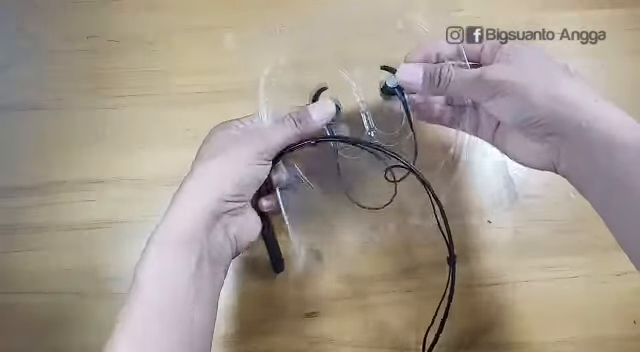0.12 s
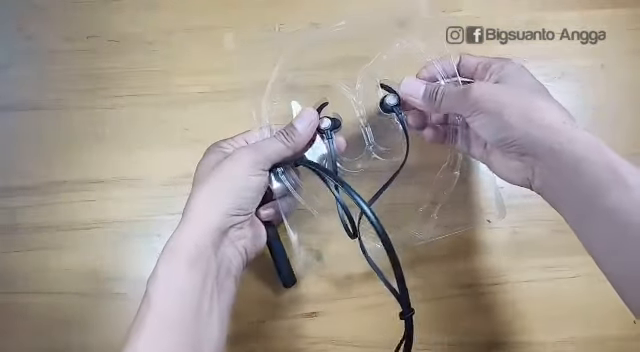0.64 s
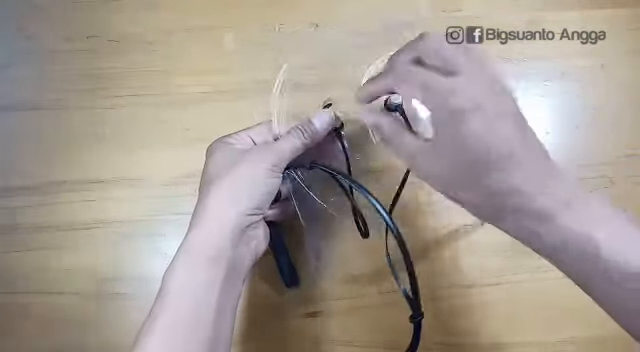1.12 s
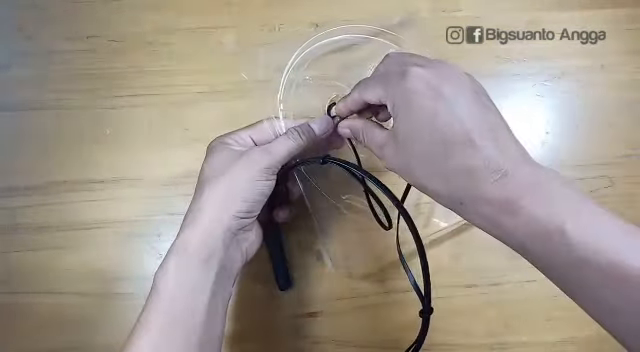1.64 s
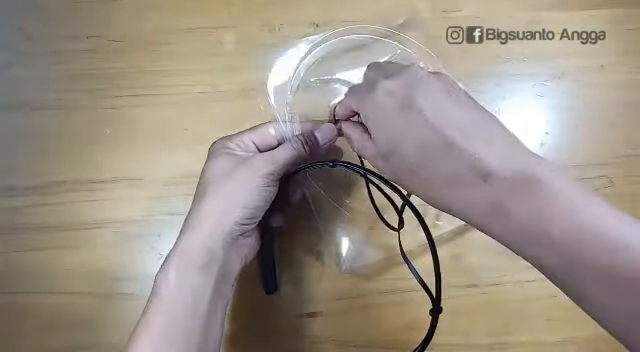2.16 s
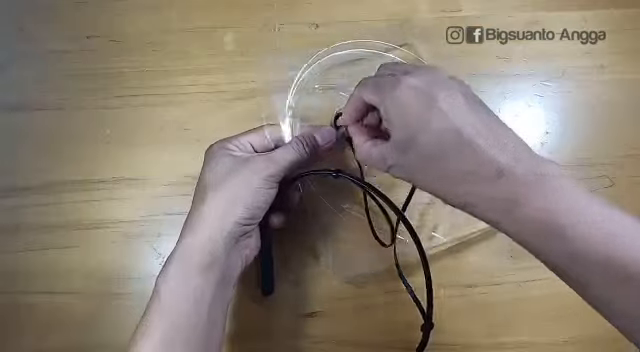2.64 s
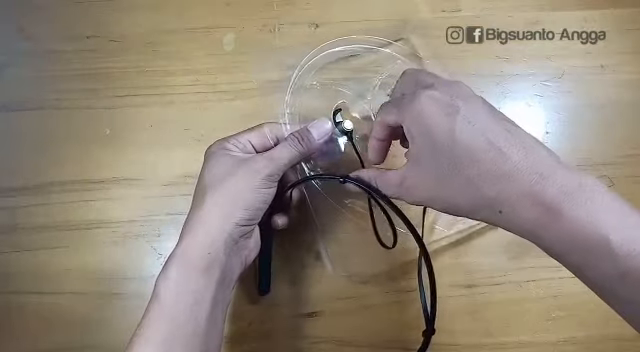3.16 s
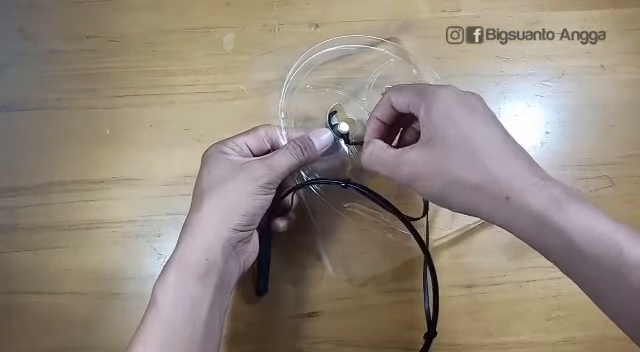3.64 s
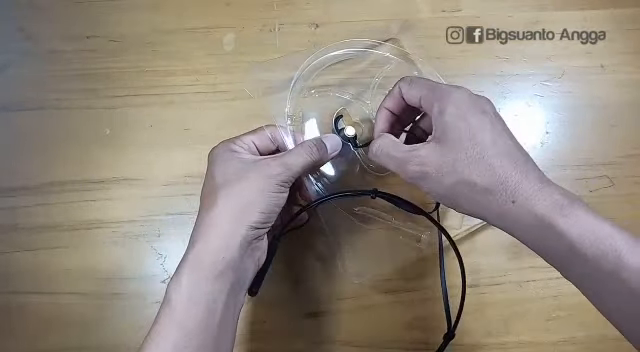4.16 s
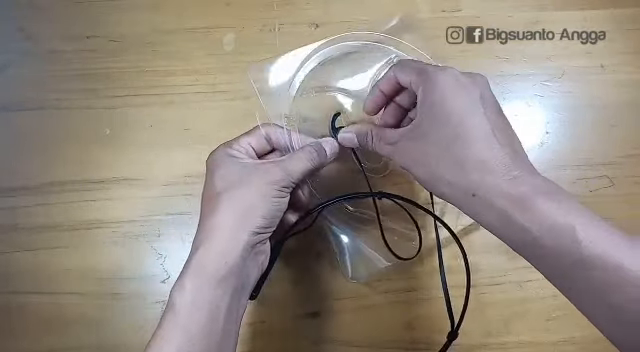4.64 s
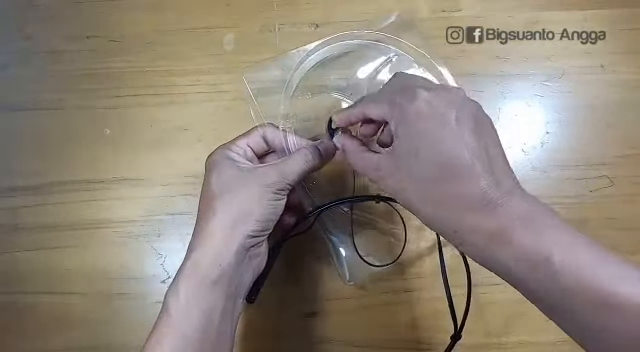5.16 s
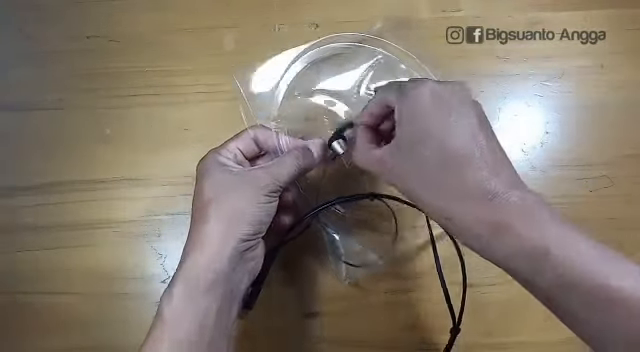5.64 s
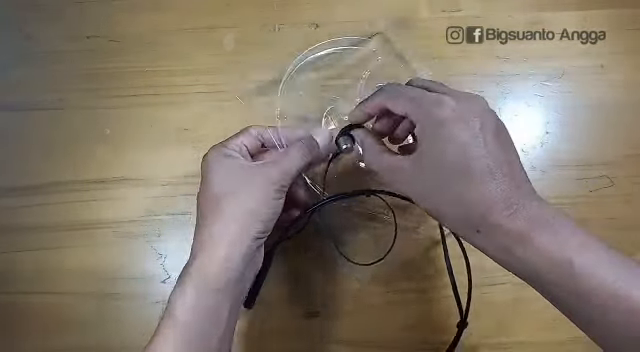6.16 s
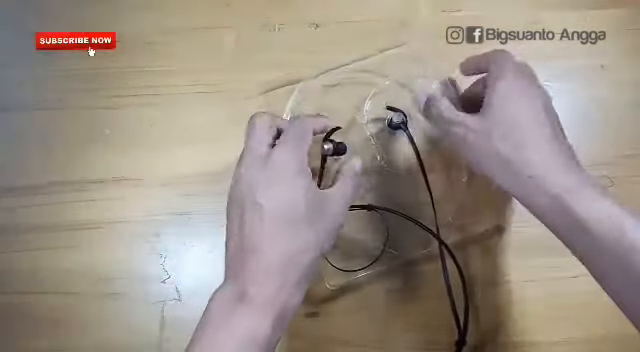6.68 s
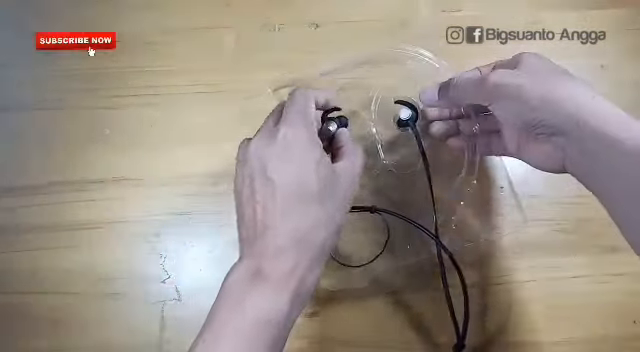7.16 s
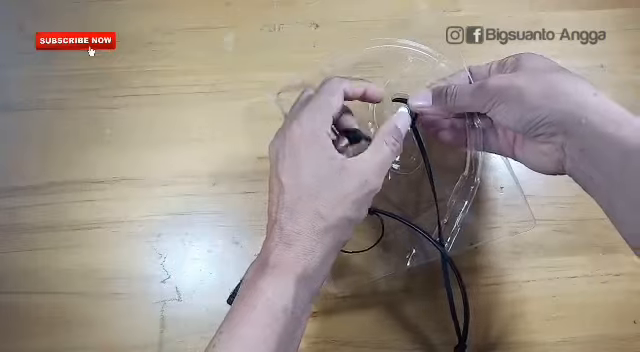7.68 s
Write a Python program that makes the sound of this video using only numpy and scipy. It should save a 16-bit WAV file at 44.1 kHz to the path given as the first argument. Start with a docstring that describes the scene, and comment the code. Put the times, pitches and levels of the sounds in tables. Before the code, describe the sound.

A thin moulded plastic tray is bent by fingers on a wooden table, heard close in stereo in a small hard room with short scattered echoes and faint hum and hiss. Soft ticks and rustling open the first 0.3 seconds, with sparse clicks until 0.8. From 1.0 to 1.5 come crackles and the strongest hollow cracks, near 1.1, 1.25 and 1.4. It quiets, then rustles and ticks at 2.4 to 2.9, with a dull knock at 3.1 and short squeaky pips near 3.45. Isolated clicks follow, with a sharp snap at 4.45 and more at 4.8 to 5.1. A brisk rub and bright snaps come at 5.7 to 5.8. From 6.1 to 6.65 crackling is dense, ending in heavier knocks. It thins to light rustles, small pips and a crisp snap at 7.4, fading into little handling noises.

```python
"""A thin moulded plastic tray snaps and ticks as fingers bend it on a wooden table, close to two microphones.
Each snap is a gritty burst of noise that sets the cups, panels and creases ringing. Cup walls give short pips
(fading tones), fingers and cable rustle over the tray (dense tiny ticks), and it knocks the table (low ringing tones).
A small hard room answers with scattered echoes, over a faint low hum and hiss made of shaped noise."""
import sys
import numpy as np
from scipy import signal
from scipy.fft import rfft, irfft
from scipy.io import wavfile
from scipy.ndimage import uniform_filter1d

SR = 44100
rng = np.random.default_rng(int(sys.argv[2]) if len(sys.argv) > 2 else 0)


def invert_db(x):
    """Field ratio 10**(x/20) for x, a level in decibels (scalar or array-like)."""
    u = np.asarray(x, float) / 20
    return 10 ** u


def output_pcm(signal):
    """Save a mono or channel-first signal as 16-bit PCM at the path in sys.argv[1].

    Samples are clipped to [-1, 1] before scaling.
    """
    pcm = np.clip(np.atleast_2d(signal).T, -1, 1) * 32767
    wavfile.write(sys.argv[1], SR, np.round(pcm).astype(np.int16))


N = 343539  # length of the scene in samples
LEAD = 512  # samples of faint crackle before a slip


def evened(x):
    """Scales a signal to an rms of 1."""
    return x / np.sqrt(np.mean(x ** 2) + 1e-20)


def read(points, hz, axis=1):
    """Looks up a column of a table between its points, on a log-frequency axis."""
    columns = np.transpose(points)
    return np.interp(np.log(hz + 1), np.log(columns[0] + 1), columns[axis])


def all_parts(cups, panels, creases, fizz):
    """Ribs lie between panels and creases; the airy top grows faster than the fizz as a slip gets brighter."""
    panel_share = 0.6
    ribs = invert_db(-0.5) * panels ** panel_share * creases ** (1 - panel_share)
    air = invert_db(1) * fizz * (fizz / creases) ** 0.79
    return [cups, panels, ribs, creases, fizz, air]


def rings(tear_s, size, creep_db, bend=0.064, uneven_db=2, grit_db=5):
    """Slips x parts x samples: a gritty burst that swells and dies sets each part of the plastic ringing."""
    # what cups, panels, ribs, creases, fizz and airy top ring with, one list for each part:
    # (pitch [Hz], level within the part [dB], time to fall by 60 dB [s])
    part_modes = [
        [(710, -5, 0.027), (827, 6.5, 0.011), (1026, 8.5, 0.012), (1253, 0, 0.01)],
        [(1557, 2, 0.011), (1994, 1.5, 0.0095), (2370, 4, 0.0056), (2695, -5, 0.011)],
        [(3130, -1.5, 0.0026), (3890, -3, 0.0065), (4366, -2, 0.004), (4880, -5, .0025)],
        [(5604, 1, 0.0022), (6467, 9.5, 0.0014), (7394, 0, 0.0011)],
        [(9460, 3.5, 0.00088), (11700, -5.5, 0.0015)],
        [(13100, 3, 0.0015), (14200, -7, 0.002)],
    ]
    slips = len(tear_s)
    tear = tear_s[:, None]
    t = np.arange(size) / SR
    since_start = t - LEAD / SR
    u = np.maximum(since_start, 0) / tear
    late = since_start - tear
    # faint crackle leads in and settles after
    creep = np.exp(np.where(late < 0, late / (3.6 * tear), -late / 0.0065))
    swell = np.e * u * np.exp(-u) + invert_db(creep_db) * creep
    swell = swell * invert_db(grit_db * rng.standard_normal((slips, size)))

    # each part feels its own grit
    noise = rng.standard_normal((slips, len(part_modes), size))
    spectrum = rfft(swell[:, None] * noise)
    # a slip drives all pitches evenly
    smooth_power = uniform_filter1d(abs(spectrum) ** 2, size // 64, axis=2)
    blows = irfft(spectrum / np.sqrt(smooth_power))

    out, ring_t = [], t[:1024]
    for modes, blow in zip(part_modes, blows.swapaxes(0, 1)):
        ring = 0
        for hz, db, t60 in modes:
            shift, loud = rng.standard_normal((2, slips, 1))
            mode_hz = hz * (1 + bend * np.tanh(shift))  # bending shifts every mode
            wave = np.sin(2 * np.pi * mode_hz * ring_t)
            # neighbouring modes start in opposite directions
            ring = invert_db(db + uneven_db * loud - 60 * ring_t / t60) * wave - ring
        edges = [0.75 * modes[0][0], 1.2 * modes[-1][0]]
        ring = signal.sosfilt(signal.butter(3, edges, "band", fs=SR, output="sos"), ring)
        sound = signal.fftconvolve(blow, ring, axes=1)[:, :size]
        # the loudest 96 samples get an rms of 1
        top = uniform_filter1d(sound ** 2, size=96, axis=1).max(1, keepdims=True)
        out.append(sound / np.sqrt(top))
    return np.stack(out, 1)


def snaps():
    """Creases flip over: every snap rings all parts, each at its own strength."""
    # the loud snaps, with the time the crease takes to give way and the strength in four parts:
    # (peak time [s], tearing [ms], moulded cups [dB], flat panels [dB], creases [dB], fizz [dB])
    snap_rows = [(0.0221, 0.8, -34.5, -41.5, -43, -64), (0.098, 0.4, -42, -34.5, -29, -35),
                 (0.158, 2.7, -40, -48, -44, -49), (0.196, 2, -44, -41, -39, -47.5),
                 (0.2119, 4, -37.5, -46.5, -37.5, -45), (0.58, 0.73, -44.5, -42, -41.5, -49),
                 (0.7758, 0.64, -66, -51, -35, -39.5), (0.7976, 0.17, -60, -53.5, -38, -37.5),
                 (1.0073, 2.6, -67.5, -54, -43, -55), (1.0255, 3.2, -32.5, -43.5, -32.5, -43.5),
                 (1.04, 2.8, -43, -32.5, -29.5, -52.5), (1.075, 3, -47, -40, -38, -49),
                 (1.1163, 0.12, -22, -17.5, -28.5, -41), (1.2437, 0.55, -29.5, -25.5, -40.5, -48),
                 (1.3817, 0.7, -26.5, -22.5, -31, -41.5), (1.4821, 1.6, -44.5, -42.5, -50, -71.5),
                 (1.8579, 0.82, -53.5, -71, -44.5, -71), (1.8671, 2.2, -45, -58.5, -53, -65.5),
                 (2.0597, 2, -48.5, -61.5, -80.5, -86), (2.356, 4.2, -42, -51, -62.5, -84),
                 (2.43, 0.93, -45, -49, -56, -56.5), (2.456, 4.4, -42.5, -46, -54, -53.5),
                 (2.509, 2.7, -44, -62, -47, -60), (2.568, 1.5, -51, -42, -33.5, -40),
                 (2.626, 1, -53, -43, -43, -57), (2.642, 1.46, -63, -42, -53, -69),
                 (2.7589, 1.4, -37.5, -45, -56, -83), (2.7868, 2, -41.5, -43.5, -56, -83),
                 (2.8114, 1.7, -29.5, -41.5, -54, -75.5), (3.1285, 2, -40, -41, -69, -84),
                 (3.409, 0.44, -61, -59, -65.5, -83), (3.772, 0.16, -40, -42, -64, -83),
                 (3.886, 1.15, -38, -41.5, -59, -85), (4.4326, 0.59, -50.5, -60, -55, -69),
                 (4.4545, 0.39, -26.5, -30, -22.5, -31), (4.478, 0.79, -34.5, -36, -43, -45),
                 (4.691, 0.75, -46.5, -70, -44.5, -78), (4.842, 0.35, -29, -36.5, -33, -46),
                 (4.9562, 0.58, -46.5, -61, -45.5, -60.5), (5.0202, 0.44, -53.5, -63, -20.5, -32),
                 (5.1038, 0.12, -69.5, -74, -29.5, -41.5), (5.2613, 1.2, -43.5, -47, -46.5, -60.5),
                 (5.5702, 3.1, -39.5, -43, -45, -60), (5.692, 1.6, -84, -86, -41, -67),
                 (5.731, 2, -29.5, -42, -49, -57), (5.7392, 0.18, -66, -61, -24.5, -35),
                 (5.748, 0.6, -29, -38.5, -29, -39.5), (5.788, 1.6, -29.5, -40, -24.5, -38.5),
                 (5.9771, 2.3, -45, -56.5, -51.5, -81), (6.009, .6, -48, -57, -40, -44),
                 (6.0248, 0.34, -78, -50.5, -39, -41.5), (6.1009, 0.14, -53, -54.5, -31, -41),
                 (6.1165, 0.14, -43.5, -50.5, -29, -38), (6.223, 1.32, -45, -39, -42, -56.5),
                 (6.2332, 0.15, -36, -43.5, -23.5, -40.5), (6.2503, 0.13, -45, -47.5, -26, -42.5),
                 (6.302, 1.24, -66, -43.5, -38.5, -55), (6.385, 2.7, -47, -34, -39, -49),
                 (6.43, 4.6, -38.5, -29, -37, -46), (6.4457, 0.52, -37, -38, -27.5, -43.5),
                 (6.4637, 0.68, -48, -34, -33, -48.5), (6.4753, 1.6, -38, -38.5, -35, -48.5),
                 (6.497, 1.5, -33.5, -35, -49, -49), (6.5288, 2.1, -34.5, -40, -41.5, -49.5),
                 (6.5503, 1.9, -43, -34, -47, -64.5), (6.58, 1.2, -48, -46, -43, -47.5),
                 (6.6336, 0.51, -23.5, -28, -41.5, -51), (6.651, 1, -26, -50, -50, -72),
                 (6.8285, 0.75, -54.5, -49.5, -59, -71), (7.084, 5, -52.5, -40, -46, -50),
                 (7.3289, 1.4, -36.5, -48, -39.5, -48), (7.4285, 1.0, -31, -32.5, -22.5, -33.5),
                 (7.476, 0.84, -34, -37, -48, -50)]
    out = np.zeros(N + SR)
    tear_s = np.array(snap_rows)[:, 1] / 1000
    for row, rise, ring in zip(snap_rows, tear_s, rings(tear_s, size=4096, creep_db=-15.0)):
        at = round((row[0] - rise - 0.0003) * SR) - LEAD  # the ring peaks just after the burst does
        strength = np.array(all_parts(*invert_db(row[2:])))
        out[at:at + ring.shape[1]] += strength @ ring
    return out[:N]


def pips():
    """A cup wall slips against a finger and sings a short soft-edged tone with two weak overtones."""
    # (peak time [s], peak level [dB], pitch [Hz], swell [ms], each overtone against the main tone [dB])
    pip_rows = [(.961, -36, 842, 5.6, -23), (2.734, -39.5, 1050, 2.8, -26), (2.885, -46, 1070, 3.5, -30),
                (3.451, -38.5, 1094, 4.4, -41), (3.463, -32, 920, 3.5, -16), (3.4775, -46.5, 750, 4.7, -12),
                (4.637, -42, 1050, 2.6, -26), (4.834, -38, 1034, 2, -18), (5.108, -33.5, 1084, 2.6, -28),
                (5.179, -37.5, 963, 2.4, -36), (6.585, -30.5, 923, 7, -33), (6.959, -49, 1144, 4, -31),
                (7.15, -37.5, 886, 6, -26), (7.278, -39, 1044, 5, -29), (7.633, -39.5, 885, 2.6, -17)]
    fade_swells, sag = 0.93, 0.045  # fade length in swells; share by which the pitch starts high and ends low
    out, t = np.zeros(N + SR), np.arange(4096) / SR
    for s, peak_db, hz, swell_ms, overtones_db in pip_rows:
        swell_s = swell_ms / 1000
        u = t / swell_s - 2  # 0 at the peak
        turns = np.cumsum(hz * (1 - sag * np.tanh(u))) / SR
        start = rng.random((3, 1))
        waves = np.sin(2 * np.pi * (np.arange(1, 4)[:, None] * turns + start))
        tone = invert_db([0, overtones_db, overtones_db]) @ waves
        envelope = np.exp(-2 * np.where(u < 0, u, u / fade_swells) ** 2)
        out[round((s - 2 * swell_s) * SR):][:len(t)] += invert_db(peak_db) * envelope * tone
    return out[:N]


def pressure(part):
    """Rub level in cups (0) or creases (1): rise, hold, fall and a slow settling, summed in power."""
    # each squeeze or rub of the fingers:
    # (full strength from [s], held [s], cups [dB], creases [dB])
    rub_rows = np.array([(0.0, 0.098, -62.5, -66), (0.124, 0.11, -51, -48.5), (0.419, 0.0067, -65, -104),
                         (0.746, 0.0099, -75, -68), (1.025, 0.06, -47.5, -44.5), (1.54, 0.022, -61, -63),
                         (2.189, 0.018, -77.5, -70.5), (2.431, 0.15, -46.5, -47.5),
                         (2.799, 0.0046, -50, -49.5), (2.961, 0.016, -58, -73.5), (3.16, 0.011, -61, -58.5),
                         (3.251, 0.038, -71.5, -84), (3.42, 0.045, -75.5, -66.5),
                         (3.55, 0.013, -76.5, -74.5), (3.679, 0.059, -65.5, -74.5),
                         (3.93, 0.0019, -49.5, -54), (4.35, 0.0037, -61, -52), (4.601, 0.015, -60, -72.5),
                         (5.122, 0.05, -62, -62), (5.229, 0.033, -61.5, -60), (5.332, 0.041, -61.5, -75.5),
                         (5.561, 0.023, -58, -60.5), (5.703, 0.064, -51, -73.5), (5.769, 0.044, -36.5, -43),
                         (6.332, 0.17, -50, -49), (6.375, 0.31, -45.5, -49.5), (6.826, 0.035, -49, -52.5),
                         (7.074, 0.11, -48.5, -52), (7.262, 0.047, -50, -55), (7.419, 0.01, -39.5, -41),
                         (7.499, 0.058, -55.5, -60), (7.664, 0.0034, -49.5, -61.5)])
    # speed of the fall: (cups [dB per s], creases [dB per s])
    fall_speed = [294.5, 406]
    # after a squeeze the bent plastic creeps back quietly, this far below it: (cups [dB], creases [dB])
    settle_level = [-22, -50]
    rise_db_per_s, settle_db_per_s = 447.5, 36
    t = np.arange(0, N, 64)[:, None] / SR
    before = np.maximum(rub_rows[:, 0] - t, 0)
    after = np.maximum(t - rub_rows[:, 0] - rub_rows[:, 1], 0)
    fall = invert_db(-fall_speed[part] * after) + invert_db(settle_level[part] - settle_db_per_s * after)
    level = invert_db(rub_rows[:, 2 + part] - rise_db_per_s * before) * fall
    return np.interp(np.arange(N) / SR, t[:, 0], np.sqrt((level ** 2).sum(1)))


def wander(depth_db, size):
    """A gain of rms 1 that drifts at random over about size samples."""
    drift = evened(uniform_filter1d(rng.standard_normal(N // 64 + 2), size // 64))
    drift = np.interp(np.arange(N) / 64, np.arange(len(drift)), drift)
    return evened(invert_db(depth_db * drift))


def flurries(size):
    """Smooth random ups and downs of rms 1: noise averaged twice over size samples."""
    return evened(uniform_filter1d(uniform_filter1d(rng.standard_normal(N), size), size))


def rustle(spread_db=2.5, panel_db=-4.5, fizz_db=-13, clump_db=2.5, own_db=3.0, dwell_db=7):
    """Rubbing makes dense small ticks in clumps, each ringing the parts of the spot where it happens."""
    ticks_per_s, spots = 3000, 12
    cups, creases = pressure(part=0), pressure(part=1)
    panels = np.sqrt(cups * creases) * invert_db(panel_db)  # between cups and creases
    fizz = creases * invert_db(fizz_db) * (creases / invert_db(-49.0)) ** 1.2  # gentle rubbing is duller
    strength = all_parts(cups, panels, creases, fizz)
    strength = [level * wander(own_db, size=500) for level in strength]  # each part has its own flurries

    clumps = flurries(300) + 0.314 * flurries(900)  # short and longer flurries
    size = invert_db(spread_db * np.minimum(rng.exponential(1, N), 4) + clump_db * clumps)
    ticks = evened(size * (rng.random(N) < ticks_per_s / SR))

    spot = rng.integers(0, spots, N)
    shapes = rings(np.full(spots, 0.0006), size=1536, creep_db=-43.5, bend=0.089, uneven_db=8.5)
    colours = invert_db(5.2 * rng.standard_normal(shapes.shape[:2]))  # each spot favours other parts
    colours = colours / np.sqrt((colours ** 2).mean(0))
    out = np.zeros(N + LEAD)
    for k, (parts, colour) in enumerate(zip(shapes, colours)):
        busy = wander(dwell_db, size=1500)  # the crackle dwells on one spot, then moves on
        for level, ring, share in zip(strength, parts, colour):
            hits = level * busy * ticks * (spot == k)
            out += signal.oaconvolve(hits, share * ring / np.linalg.norm(ring))[:N + LEAD]
    return out[LEAD:]


def knocks():
    """The tray bounces as a whole and pushes softly into the table top."""
    # the tray knocks the table top: (start [s], tray [dB], table [dB])
    knock_rows = [(0.1, -46, -56), (0.756, -46, -72), (1.042, -45.5, -85), (1.126, -37.5, -56),
                  (1.385, -42.5, -64), (3.125, -33, -63), (3.242, -55.5, -74), (3.77, -39, -80),
                  (5.562, -50, -58), (5.789, -41.5, -49.5), (6.227, -45.5, -57.5), (6.547, -37, -72),
                  (6.629, -31.5, -46.5), (6.649, -33, -43), (6.851, -45, -54.5), (6.983, -52, -62.5),
                  (7.419, -35.5, -81)]
    # the wooden table top: (pitch [Hz], level within the table [dB], time to fall by 60 dB [s])
    table_modes = [(102, 1, 0.07), (232, 10, 0.034)]
    # the whole tray: (pitch [Hz], level within the tray [dB], time to fall by 60 dB [s])
    tray_modes = [(303.3, -6, 0.057), (405, 10.5, 0.033), (527, -4, 0.034), (645, 2.5, 0.043)]
    out, t = np.zeros(N + SR), np.arange(SR // 4) / SR
    wood = sum(invert_db(db - 60 * t / t60) * np.sin(2 * np.pi * hz * t) for hz, db, t60 in table_modes)
    soft_push = (1 - np.exp(-t / 0.0029)) ** 2
    for s, tray_db, table_db in knock_rows:
        tray = 0
        for hz, db, t60 in tray_modes:
            bent, loud = rng.standard_normal(2)  # each knock differs a little in pitch and level
            wave = np.sin(2 * np.pi * hz * (1 + 0.044 * bent) * t)
            tray = tray + invert_db(db + 2 * loud - 60 * t / t60) * wave
        out[round(s * SR):][:len(t)] += soft_push * (invert_db(tray_db) * tray + invert_db(table_db) * wood)
    return out[:N]


def room(x):
    """Walls send back sparse taps that die band by band; three tails take turns."""
    # how the room dies away: (frequency [Hz], time to fall by 60 dB [s], level [dB])
    room_bands = [(265, 0.16, 8.5), (950, 0.2, -7.5), (2860, 0.26, -2), (6400, 0.35, -7), (14400, 0.24, -6)]
    # how unlike the room is at the two microphones: (frequency [Hz], own part against shared part [factor])
    unlike = [(150, 0.3), (400, 0.3), (1200, 0.56), (3000, 0.33), (9000, 1)]
    out, turn = np.zeros((2, N)), np.arange(N) / SR / 0.11
    for k in range(3):
        # one tap at a random place in every 20 samples, in three rows: shared, left, right
        taps = np.zeros((3, SR // 2))
        grid = np.arange(160, SR // 2 - 20, 20)
        at = grid + rng.integers(0, 20, (3, len(grid)))
        np.put_along_axis(taps, at, rng.choice([-1., 1.], at.shape), 1)
        hz, t, z = signal.stft(taps, SR, nperseg=256)
        z = z[0] + read(unlike, hz)[:, None] * z[1:]  # the microphones sit close together
        t60 = read(room_bands, hz)[:, None]
        band_db = read(room_bands, hz, axis=2)[:, None]
        z *= invert_db(band_db - 60 * t / t60) / np.sqrt(t60)  # the same energy whatever the decay time
        tail = signal.istft(z, SR, nperseg=256)[1]
        tail = tail / np.sqrt(SR * np.mean(taps ** 2) / (6 * np.log(10)))
        window = np.sqrt(2 / 3) * np.cos(np.pi * (turn + k / 3))  # the three powers add up to 1
        out += signal.fftconvolve((x * window)[None], tail, axes=1)[:, :N]
    return out


def hum_and_hiss(patchy_db=2.2):
    """Faint steady noise, strongest in the bass, with drifting patches in pitch and time."""
    # colour of the noise, relative: (frequency [Hz], density [dB per Hz])
    colour = [(30, 4.5), (115, 7), (632, -10), (1010, -11.5), (1320, -12.5), (3060, -16.5), (4910, -22.5),
              (6550, -10.5), (8300, -24), (14000, -20.5), (16000, -46.5)]
    # how alike left and right are: (frequency [Hz], likeness [0 to 1])
    likeness = [(60, 1), (200, 0.71), (640, 0.16), (3000, 0.2)]
    frames, hz = N // 256 + 5, np.fft.rfftfreq(1024, 1 / SR)
    a, b, c, d, patches = rng.standard_normal((5, 513, frames))
    patches = evened(uniform_filter1d(uniform_filter1d(patches, 10, 0), 12, 1))
    same = np.clip(read(likeness, hz), -1, 1)[:, None]
    left = a + 1j * b
    right = same * left + np.sqrt(1 - same ** 2) * (c + 1j * d)
    z = np.array([left, right]) * invert_db(read(colour, hz)[:, None] + patchy_db * patches)
    noise = signal.istft(z, nperseg=1024, noverlap=768)[1][:, :N]
    return invert_db(-70.5) * evened(noise)


def scene():
    """The tray straight ahead, its room and the background."""
    tray = snaps() + pips() + rustle() + knocks()
    early = signal.lfilter([1, -1], [1], tray)  # a tiny path difference between the microphones
    return tray + 0.09 * np.array([early, -early]) + room(tray) + hum_and_hiss()


def band_limit(x):
    """A steep low-pass at the top of the band."""
    return signal.sosfilt(signal.butter(12, 16800, fs=SR, output="sos"), x)


def record(dry):
    """Air resonating in the microphone port lifts one treble band, and the deepest bass is lost."""
    port_hz, port_width_hz, port_db = 6560, 530, -10.5
    dry = signal.lfilter(*signal.butter(3, 60, "high", fs=SR), dry)
    lift = signal.lfilter(*signal.iirpeak(port_hz, port_hz / port_width_hz, SR), dry)
    return band_limit(dry + invert_db(port_db) * lift)


dry = scene()
out = record(dry)
output_pcm(out)
```